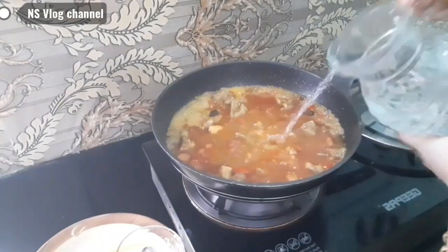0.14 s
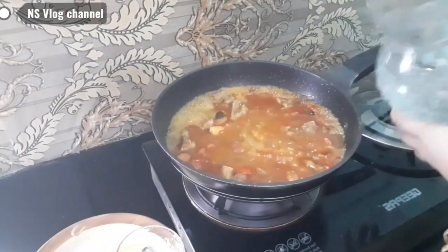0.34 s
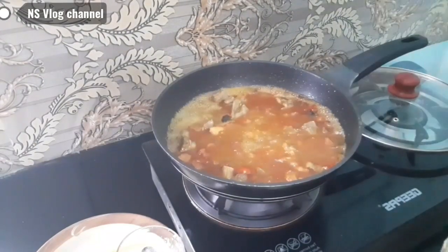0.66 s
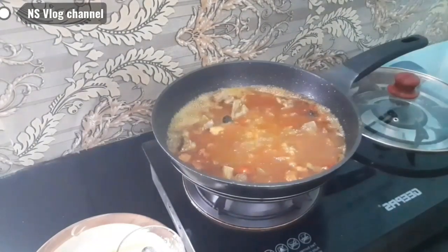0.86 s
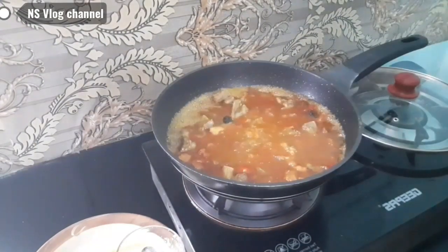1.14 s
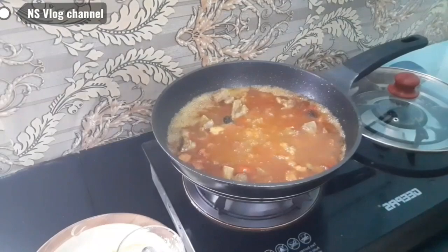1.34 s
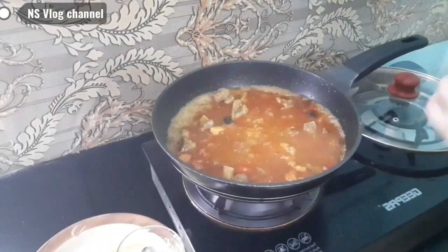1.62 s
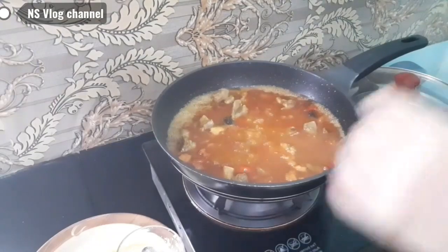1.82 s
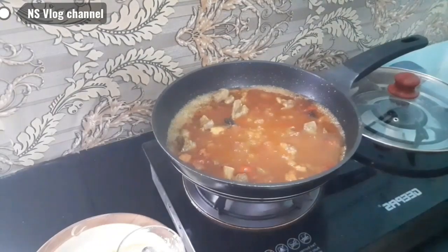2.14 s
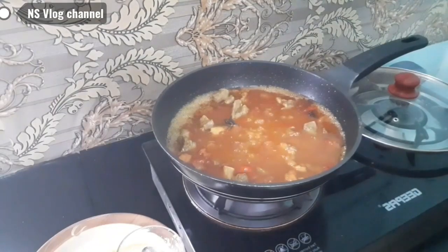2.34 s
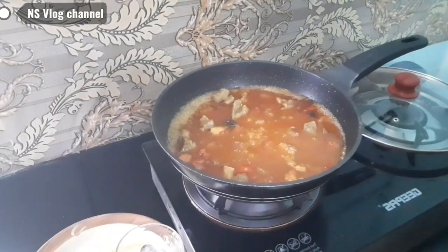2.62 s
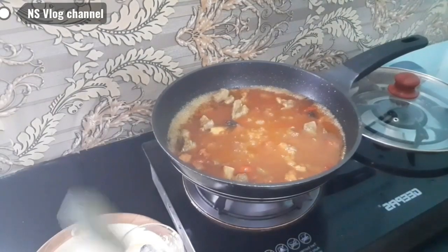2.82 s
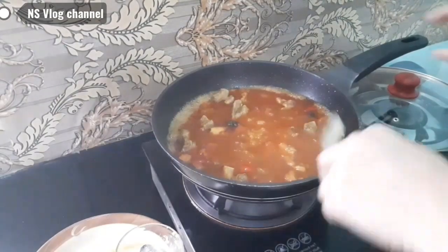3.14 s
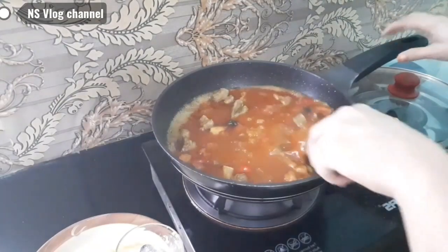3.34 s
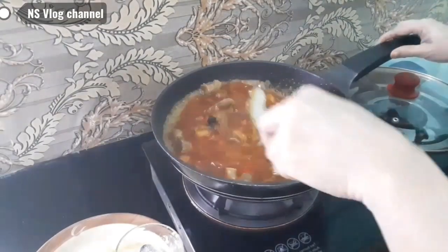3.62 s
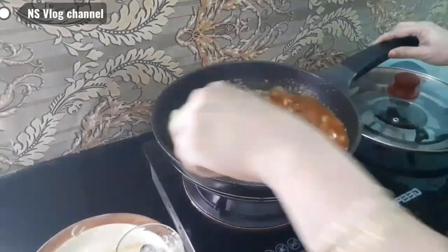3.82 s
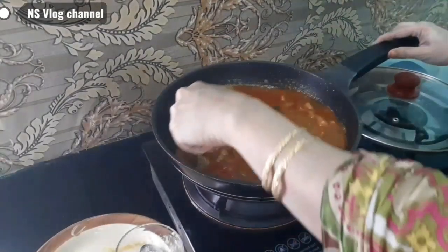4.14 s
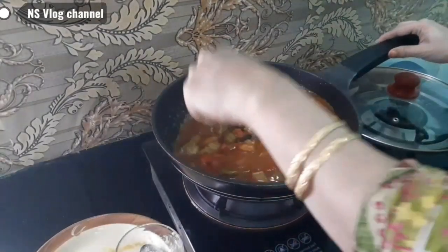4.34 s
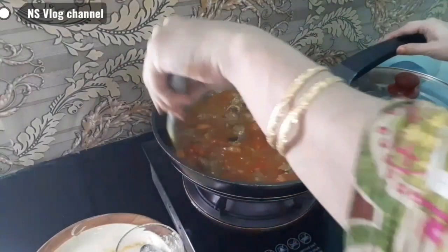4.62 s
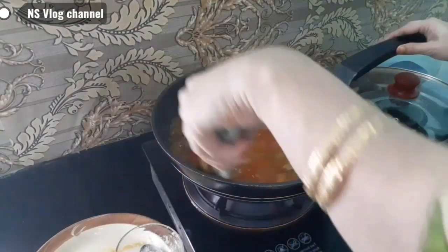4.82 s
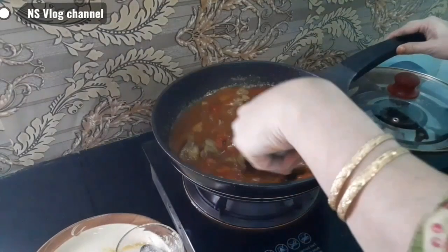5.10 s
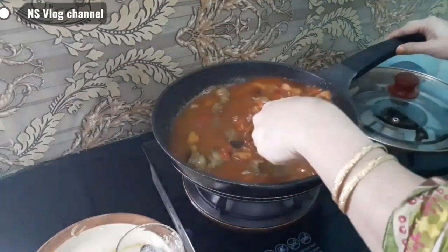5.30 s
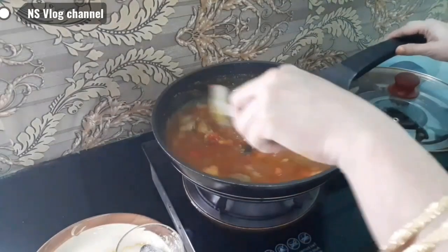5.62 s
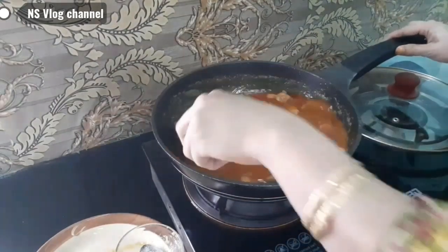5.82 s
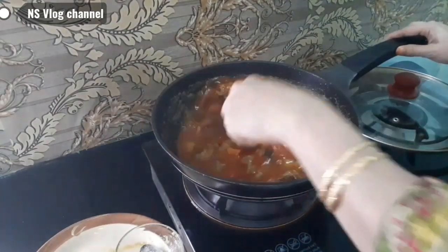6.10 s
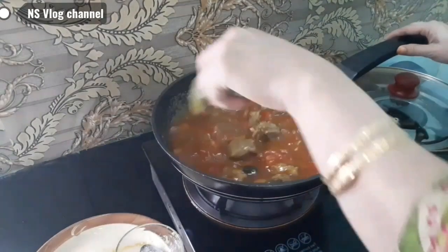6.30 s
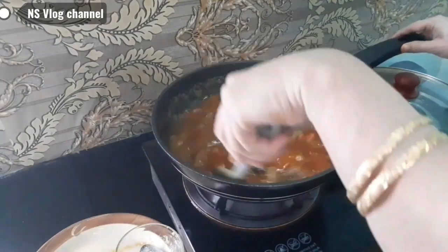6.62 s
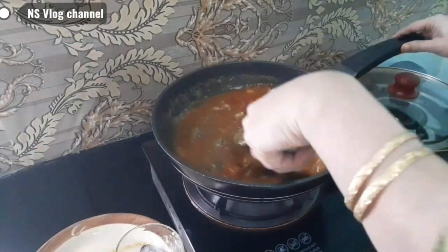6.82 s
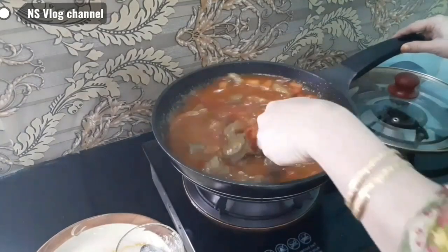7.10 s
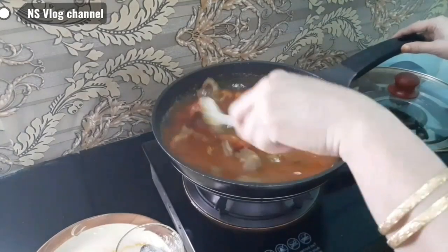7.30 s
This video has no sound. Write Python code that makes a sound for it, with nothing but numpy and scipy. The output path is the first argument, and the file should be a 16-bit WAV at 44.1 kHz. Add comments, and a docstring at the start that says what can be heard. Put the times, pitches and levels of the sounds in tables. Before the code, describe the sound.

Water finishes pouring into a finely fizzing curry, a jug knocks the pan rim, then a spatula stirs with taps and wet plops over fan hum.

```python
"""In a small, hard-walled kitchen, a jug finishes pouring water into curry, knocks the rim and drips.
The curry simmers with a fine fizz of random bursts; a spatula stirs it with taps, sloshes and a fat plop.
A fan hums, swelling and fading: motor, blade and frame tones lie in rushing air made of noise.
Contacts and drops are short noise bursts, the rim is a set of fading tones, plops are tones that climb."""
import sys
import numpy as np
from scipy import signal
from scipy.fft import rfft, irfft, next_fast_len
from scipy.io import wavfile
from scipy.ndimage import uniform_filter1d, map_coordinates

SR = 44100
rng = np.random.default_rng(int(sys.argv[2]) if len(sys.argv) > 2 else 0)


def wav_out(sig):
    """Save sig, one row per channel (or a flat mono array), as 16-bit PCM at SR to the path in sys.argv[1]."""
    wavfile.write(sys.argv[1], SR, np.round(np.clip(np.atleast_2d(sig).T, -1, 1) * 32767).astype(np.int16))


N = 328721

# Spectrum of the moving sauce, before levelling: pitch_hz, relative_db
SAUCE_SPECTRUM = [(60, -29), (300, 1.5), (600, -0.5), (1300, -1.5), (2500, -3), (3800, -1), (4800, -11.5),
                  (15000, -9)]
# Spatula strokes through the sauce: crest_s, level_db, length_s
STROKES = [(3.42, -51, .6), (3.72, -54, .12), (4.15, -57, .4), (4.986, -45.5, 0.15), (5.344, -43, .14),
           (5.473, -41, .07), (6.315, -39, 0.26), (6.69, -51, 0.14), (7.23, -45.5, 0.25),
           (7.415, -48.5, .1)]
# Loudness of the simmer, before a fixed boost for each column: time_s, fizz_db, finest_fizz_db
SIMMER_LEVELS = [(0.0, -56.5, -62), (0.33, -50.5, -55), (0.46, -55.5, -62), (1.04, -57, -62),
                 (1.64, -54.5, -68), (1.82, -53, -62.5), (2.97, -54, -64), (3.3, -53, -60.5),
                 (3.84, -56, -62), (4.34, -53, -56.5), (5.04, -58, -61), (5.5, -54.5, -56.5),
                 (5.79, -61.5, -57), (6.2, -55.5, -58), (6.97, -60, -60), (7.45, -59, -61)]
# Spectrum of the fizz, before levelling: pitch_hz, relative_db
FIZZ_SPECTRUM = [(100, -51), (700, 2), (1500, 1.5), (2500, 0.5), (5000, 0), (9000, 2), (13000, 2),
                 (15800, -11)]
# Swelling hum of the fan motor, before a small boost: time_s, level_db
MOTOR_LEVELS = [(0.0, -56), (0.04, -48), (0.74, -49), (1.22, -69), (1.91, -45), (2.8, -51.5), (3.15, -61),
                (3.26, -48.5), (3.53, -63), (3.63, -49.5), (5.39, -59), (6.39, -48.5), (6.68, -57),
                (6.76, -75), (6.83, -59), (7.45, -51.5)]
# Level of the fan's blade tone, before its flutter: time_s, level_db
BLADE_LEVELS = [(0, -44.5), (.6, -57.5), (1.85, -58), (2.2, -48.5), (2.6, -55.5), (3.7, -51.5),
                (4.6, -52.5), (6.3, -51), (7.45, -51)]
# Weak motor and frame tones: pitch_hz, rms_db
FAN_TONES = [(296, -73.5), (342, -72), (354, -67), (422, -66.5), (456, -67), (516, -77), (532, -62),
             (635, -65), (680, -70), (840, -74.5)]
# Spectrum of the moving air, before levelling: pitch_hz, relative_db
AIR_SPECTRUM = [(25, -19), (45, -13.5), (90, -4.5), (150, 0.5), (200, -7.5), (300, -5), (380, -9.5),
                (480, -2.5), (660, -1.5), (800, -10), (1400, -11), (2500, -17), (6000, -26)]
# The jug meets the rim (a single row): start_s, level_db
KNOCK = (.2082, -13.5)
# Ways the pan rings, relative to the knock: pitch_hz, level_db, fall_by_60_db_s
PAN_MODES = [(357, -0.5, 0.38), (408, 1.7, 0.27), (550, -16.5, 0.015), (1010, -30, 0.0082),
             (1880, -11.5, 0.005), (1387, -32, 0.34), (1960, -29, .1), (2860, -30, 0.065),
             (3960, -34, 0.053), (8723, -32, .17), (9300, -27, .1), (9507, -30, .2), (9881, -36, .2)]
# Noise of the jug's knock: level_over_knock_db, centre_hz, width_octaves, fall_by_60_db_s
KNOCK_NOISE = [(0, 9550, .33, 0.021), (-10, 3500, 1, 0.0077), (-20, 1600, 0.5, 0.18)]
# Spatula taps and wet splats, dull or bright: start_s, level_db, centre_hz, width_octaves
TAPS = [(2.612, -32, 330, .55), (2.62, -31.5, 1000, 1.2), (3.693, -31, 575, 0.35), (3.718, -32, 800, 1.4),
        (4.143, -31, 564, 0.39), (4.1432, -32.5, 1350, 0.32), (4.998, -38, 2400, .35),
        (5.469, -30, 2800, 0.86), (6.218, -27, 4500, 1.4), (6.279, -29, 2780, .3), (6.283, -32, 1010, .3),
        (6.318, -24.5, 517, 1), (7.241, -30.5, 3180, 0.63), (7.2515, -18.5, 1800, 2.3)]
# Drops and spitting sauce on hot metal: start_s, level_db, centre_hz
SPITS = [(0.373, -29, 7000), (0.4533, -23.5, 5960), (1.319, -32, 9500), (2.0015, -34, 5740),
         (2.0479, -34, 6300), (2.623, -28.5, 8500), (2.645, -33, 9500), (2.8356, -29.5, 8500),
         (3.0588, -32.5, 9500), (3.168, -34, 9500), (3.455, -30.5, 5460), (3.495, -27, 8360),
         (4.359, -35.5, 5000), (4.8076, -33.5, 8000), (5.368, -31.5, 4900), (6.382, -30.5, 6000),
         (6.6794, -33, 8800)]
# Left level over right level for contacts: pitch_hz, difference_db
SHADOW = [(700, -3), (3000, 0), (6000, 1), (9000, 0.5), (15000, 8)]
# Air pockets closing in the liquid: start_s, peak_db, starting_pitch_hz
PLOPS = [(.351, -40, 3700), (0.372, -37, 4220), (.886, -43, 2720), (3.622, -37, 1290), (3.713, -35, 1270),
         (3.725, -40, 1980), (4.962, -42.5, 1900), (5.429, -43, 1470), (6.244, -29, 870),
         (6.2766, -15, 892), (6.284, -36, 3480), (6.304, -34, 970), (6.329, -31, 1380), (6.364, -34, 2070),
         (6.373, -38, 3060), (6.442, -39, 1680), (7.146, -38.5, 604), (7.2437, -31.5, 3130),
         (7.252, -38.5, 1090), (7.413, -42.5, 1440)]
# Thin high tones, and one very short high tick: start_s, starting_level_db, pitch_hz, fall_by_60_db_s
HIGH_TONES = [(.847, -45, 14100, .2), (.853, -47, 12000, 0.33), (5.8357, -31, 14900, .025)]
# How alike left and right are in the wide sounds: pitch_hz, likeness (1 = the same, no unit)
ALIKE = [(30, -0.0017), (100, 0.77), (280, 0.81), (480, 0.31), (700, 0.24), (1500, -0.12), (4000, -0.18),
         (9000, -0.022)]
# How long the kitchen's echo lasts: pitch_hz, fall_by_60_db_s
KITCHEN_ECHO = [(150, 0.45), (1000, 0.28), (4000, 0.29), (14000, 0.11)]
# Tone of the microphone: pitch_hz, gain_db
MICROPHONE = [(20, -4), (55, 1), (6300, -1), (7700, -4.5), (8700, 2), (9500, 0.5), (10800, -3), (16000, -2)]

# The stream runs evenly, then thins out as the jug lifts
POUR_DB, POUR_END_S, POUR_FADE_DB_PER_S = -50.5, 0.35, 130
# Share of a stroke spent rising; how far below the crest it starts and ends
STROKE_RISE, STROKE_RANGE_DB = 0.45, 13.5
MAINS_HZ = 60
MOTOR_HZ, MOTOR_DRIFT_HZ = 113.4, 0.22
BLADE_HZ, BLADE_FLUTTER_DB = 228.4, 2.3
# Decay of a tap or splat with this bandwidth; wider ones die sooner by this power
TAP_T60_S, TAP_BAND_HZ, TAP_DAMPING = 0.04, 960, 0.74
SPIT_OCTAVES, SPIT_T60_S = 0.64, 0.017
# Weaker spits come at random, around this level and pitch
SMALL_SPITS_PER_S, SMALL_SPIT_DB, SMALL_SPIT_HZ = 4, -39, 9500
# Ring of a pocket of this pitch; higher ones die sooner by this power
PLOP_T60_S, PLOP_HZ, PLOP_DAMPING = 0.0165, 1000, 0.15
TOP_HZ = 15830


def amp(db):
    """Turn decibels into a gain."""
    return 10 ** (np.asarray(db) / 20)


def unit(x):
    """Bring a sound to an average (rms) level of 1."""
    return x / np.sqrt(np.mean(x ** 2) + 1e-20)


def along(points, hz):
    """Read a table of (pitch, value) points, with pitch on a log scale."""
    point_hz, value = np.transpose(points)
    return np.interp(np.log(hz + 1), np.log(point_hz + 1), value)


def curves(rows):
    """Draw one value per sample for each column after the time."""
    time_s, *columns = np.transpose(rows)
    return [np.interp(np.arange(N) / SR, time_s, column) for column in columns]


def wobble(rate):
    """Draw a smooth random curve through this many random points a second."""
    points = rng.standard_normal(int(N * rate / SR) + 4)
    return map_coordinates(points, [np.arange(N) * rate / SR])


def filtered(x, response):
    """Scale each pitch in a sound by a gain that depends on frequency."""
    length = x.shape[-1]
    padded = next_fast_len(length + SR // 4)
    hz = np.fft.rfftfreq(padded, 1 / SR)
    return irfft(rfft(x, padded) * response(hz), padded)[..., :length]


def add(track, start_s, sound):
    """Mix a sound into a stereo track at its start time."""
    part = track[:, round(start_s * SR):][:, :sound.shape[-1]]
    part += sound[..., :part.shape[-1]]


def panned(x, left_db):
    """Make the left side louder than the right by left_db."""
    return x * amp([[left_db / 2], [-left_db / 2]])


def diffuse(pair, spectrum):
    """Colour two channels and spread them wide, nearly mono in most of the bass, at rms 1."""
    def shares(hz):
        turn = np.arccos(np.clip(along(ALIKE, hz), -1, 1)) / 2
        return amp(along(spectrum, hz)) * [np.cos(turn), np.sin(turn)]

    middle, side = filtered(pair, shares)
    return unit(np.array([middle + side, middle - side]))


def patchy(depth_db):
    """Make two noises whose gain drifts in patches of time and frequency."""
    spectrum = signal.stft(rng.standard_normal((2, N)), nperseg=512)[2]
    patches = rng.standard_normal(spectrum.shape[1:])
    patches = uniform_filter1d(patches, size=12, axis=0)
    patches = uniform_filter1d(patches, size=8, axis=1)
    noise = signal.istft(spectrum * amp(depth_db * unit(patches)), nperseg=512)[1]
    return unit(noise[:, :N])


def bubbles(count, hz, octaves, cycles, spread_db, size):
    """Scatter fading, slightly rising rings of random pitch and strength over two channels."""
    start = rng.integers(0, N, (count, 1))
    samples = np.arange(size)
    pitch = hz * 2 ** np.clip(octaves * rng.standard_normal((count, 1)), -2, 1)
    turns = pitch * samples / SR
    age = turns / cycles
    strength = amp(spread_db * np.minimum(rng.exponential(size=(count, 1)), 4))
    rings = strength * np.sin(2 * np.pi * turns * (1 + age / 20)) * np.exp(-age)
    where = (start + samples).ravel()
    channels = []
    for _ in range(2):
        weighted = rings * rng.standard_normal((count, 1))
        channels.append(np.bincount(where, weighted.ravel(), N + size)[:N])
    return unit(np.array(channels))


def slosh():
    """Sauce moved by the stream and strokes traps small bubbles over a wet swish in quick spurts."""
    t = np.arange(N) / SR
    motion = amp(POUR_DB - POUR_FADE_DB_PER_S * np.maximum(t - POUR_END_S, 0))
    for crest_s, db, length_s in STROKES:
        rising, falling = (crest_s - t) / STROKE_RISE, (t - crest_s) / (1 - STROKE_RISE)
        from_crest = np.maximum(rising, falling) / length_s
        motion = np.hypot(motion, amp(db - STROKE_RANGE_DB * from_crest))
    gurgle = bubbles(count=3500, hz=1865, octaves=0.735, cycles=2.4, spread_db=-2, size=700)
    swish = amp(3.2 * wobble(70)) * patchy(depth_db=4.0)
    return motion * diffuse(0.38 * gurgle + swish, SAUCE_SPECTRUM)


def simmer(bright_hz=10800, flutter_db=1.23, surge_db=1.25, fine_surge_db=2.0):
    """Tiny steam bubbles burst in a fizz with sharp snaps; its top treble comes and goes on its own."""
    fizz_db, fine_db = curves(SIMMER_LEVELS)
    crackle = bubbles(count=7000, hz=8720, octaves=0.584, cycles=3.4, spread_db=5.5, size=96)
    snaps = bubbles(count=500, hz=9100, octaves=0.21, cycles=0.76, spread_db=6.0, size=32)
    hiss = amp(flutter_db * wobble(110)) * rng.standard_normal((2, N))
    fizz = diffuse(hiss + 0.22 * crackle + 0.12 * snaps, FIZZ_SPECTRUM)
    fizz = amp(surge_db * wobble(15)) * fizz
    fine = filtered(fizz, lambda hz: 1 - 1 / (1 + (hz / bright_hz) ** 10))
    body = amp(fizz_db + 5.5) * (fizz - fine)
    top = amp(fine_db + 12 + fine_surge_db * wobble(9)) * fine
    return panned(body + top, left_db=0.9)


def fan(mains_db=-57.5, motor_gain_db=0.1):
    """The slipping motor hums below twice the mains rate, so the two beat; blade, frame and air join in."""
    motor_db, = curves(MOTOR_LEVELS)
    blade_db, = curves(BLADE_LEVELS)
    t = np.arange(N) / SR
    pitch = MOTOR_HZ + MOTOR_DRIFT_HZ * wobble(1.98)
    motor = amp(motor_db + motor_gain_db) * unit(np.sin(2 * np.pi * np.cumsum(pitch) / SR))
    mains = amp(mains_db) * unit(np.sin(2 * np.pi * 2 * MAINS_HZ * t))

    # the draught makes the blade tone flutter
    flutter = 1 + (amp(BLADE_FLUTTER_DB) - 1) * wobble(13)
    blades = amp(blade_db) * flutter * unit(np.sin(2 * np.pi * BLADE_HZ * t + 0.28 * wobble(24)))
    tones = np.zeros(N)
    for hz, db in FAN_TONES:
        swell = 1 + 0.5 * wobble(7)
        tones += amp(db) * unit(swell * np.sin(2 * np.pi * hz * t + 0.87 * wobble(8)))
    air = amp(-48.5 + 0.75 * wobble(3.97)) * diffuse(patchy(depth_db=1.4), AIR_SPECTRUM)
    return panned(motor + mains + blades + tones, left_db=-2.5) + panned(air, left_db=-1.3)


def pan_ring(first_swing=0.82, settle_s=0.01):
    """The rim's two lowest tones start opposed and beat; it falls faster at first, while the jug touches."""
    out, t = np.zeros((2, N)), np.arange(SR * 3 // 4) / SR
    start_s, knock_db = KNOCK
    ring = np.zeros(len(t))
    for k, (hz, db, t60) in enumerate(PAN_MODES):
        ring += (-1) ** k * amp(db - 60 * t / t60) * np.sin(2 * np.pi * hz * t)
    add(out, start_s, amp(knock_db) * ring * (1 + first_swing * np.exp(-t / settle_s)))
    return panned(out, left_db=-4.5)


def burst(db, centre, octaves, t60):
    """A contact is fading stereo noise in a band set by how hard and small the things are."""
    t = np.arange(SR // 6) / SR

    def band(hz):
        return np.exp(-(np.log2((hz + 1) / centre) / octaves) ** 2 / 2)

    # part shared by both ears, part different
    source = rng.standard_normal(len(t)) + 1.07 * rng.standard_normal((2, len(t)))
    noise = unit(filtered(source, band))
    attack = 1 - np.exp(-t * centre)
    return amp(db - 6.0) * noise * amp(-60 * t / t60) * attack


def contacts():
    """Jug, spatula, splats and spits make short bursts; the recorder's body shades one side's treble."""
    out = np.zeros((2, N))
    knock_s, knock_db = KNOCK
    for db, centre, octaves, t60 in KNOCK_NOISE:
        add(out, knock_s, burst(knock_db + db, centre, octaves, t60))
    for start_s, db, centre in SPITS:
        add(out, start_s, burst(db, centre, SPIT_OCTAVES, SPIT_T60_S))
    for when, strength, size in rng.random((round(SMALL_SPITS_PER_S * N / SR), 3)):
        db = SMALL_SPIT_DB + 6 * (strength - 0.5)
        centre = SMALL_SPIT_HZ * 2 ** (size - 0.5)
        add(out, when * N / SR, burst(db, centre, SPIT_OCTAVES, SPIT_T60_S))
    for start_s, db, centre, octaves in TAPS:
        t60 = TAP_T60_S * (TAP_BAND_HZ / (centre * octaves)) ** TAP_DAMPING
        add(out, start_s, burst(db, centre, octaves, t60))
    return filtered(out, lambda hz: amp(np.outer([0.5, -0.5], along(SHADOW, hz))))


def plops(rise=0.15, swell=0.07):
    """Each air pocket swells, rings and climbs in pitch as it nears the surface; big ones ring longer."""
    out, t = np.zeros((2, N)), np.arange(SR // 8) / SR
    for start_s, db, hz in PLOPS:
        age = t / (PLOP_T60_S * (PLOP_HZ / hz) ** PLOP_DAMPING)
        shape = amp(-60 * age) * (1 - np.exp(-(age / swell) ** 2))
        pitch = hz * (1 + rise * np.minimum(age, 1))
        phase = 2 * np.pi * np.cumsum(pitch) / SR
        add(out, start_s, amp(db) * shape / shape.max() * np.sin(phase))
    return out


def high_tones(rough=0.8):
    """Thin high tones fade, each at one unsteady pitch."""
    out, t = np.zeros((2, N)), np.arange(SR // 4) / SR
    for start_s, db, hz, t60 in HIGH_TONES:
        phase = 2 * np.pi * hz * t + rough * wobble(400)[:len(t)]
        add(out, start_s, amp(db - 60 * t / t60) * np.sin(phase))
    return out


def kitchen(x):
    """The walls answer with fading noise, different at each ear; the highest treble dies first."""
    hz, t, spectrum = signal.stft(rng.standard_normal((2, SR // 2)), SR, nperseg=256)
    fade = amp(-60 * t / along(KITCHEN_ECHO, hz)[:, None])
    tail = signal.istft(spectrum * fade, SR, nperseg=256)[1]
    # the echo starts 3.6 ms late
    tail = np.pad(tail, ((0, 0), (round(0.0036 * SR), 0)))
    return signal.fftconvolve(x, tail / np.linalg.norm(tail[0]), axes=1)[:, :N]


def scene():
    """Mix the pan and fan, with kitchen echo on the ring, contacts and plops."""
    steady = slosh() + simmer() + fan()
    ring, touches, pockets, high = pan_ring(), contacts(), plops(), high_tones()
    room = kitchen(amp(-16) * ring + amp(-2.0) * touches + amp(-2.5) * pockets)
    return ring + touches + pockets + high + room + steady


def record(dry):
    """The microphone port resonates in the treble; nothing passes above the top limit."""
    return filtered(dry, lambda hz: amp(along(MICROPHONE, hz)) * (hz < TOP_HZ))


dry = scene()
out = record(dry)
wav_out(out)
```